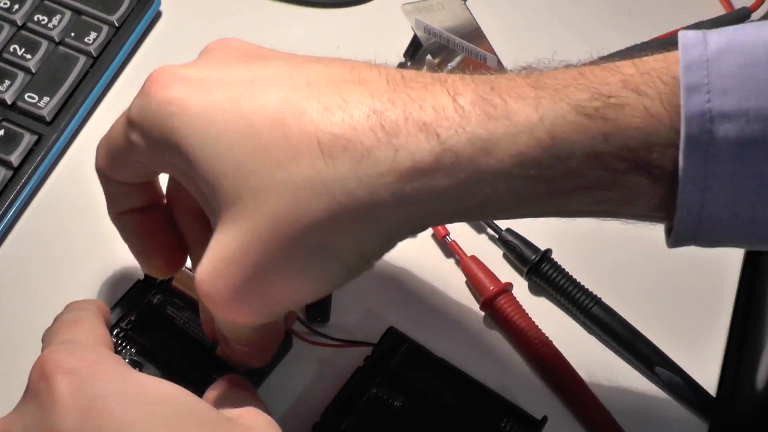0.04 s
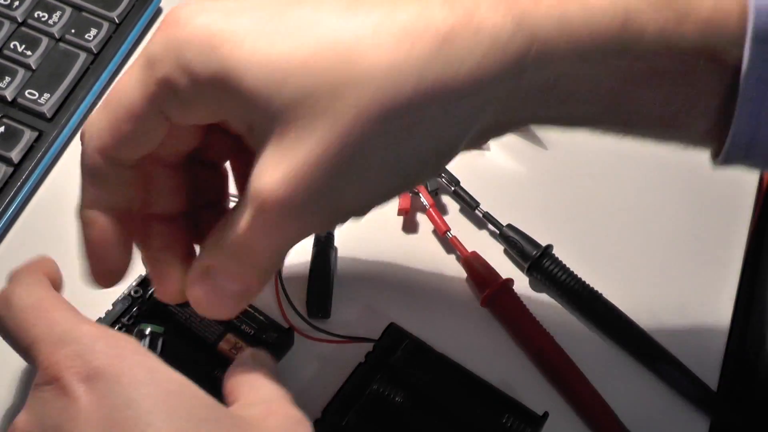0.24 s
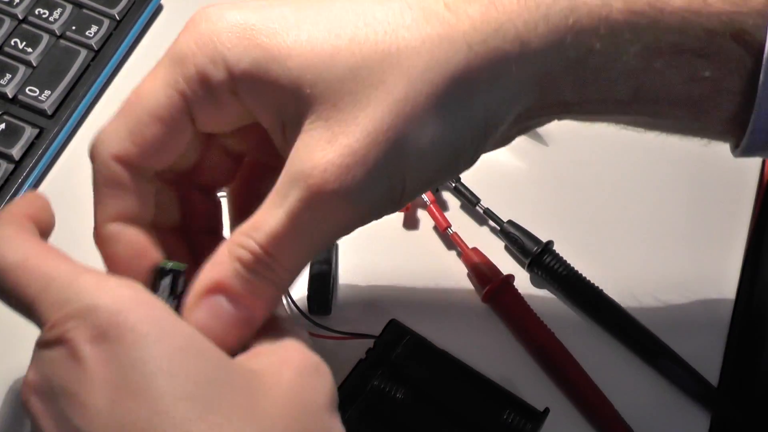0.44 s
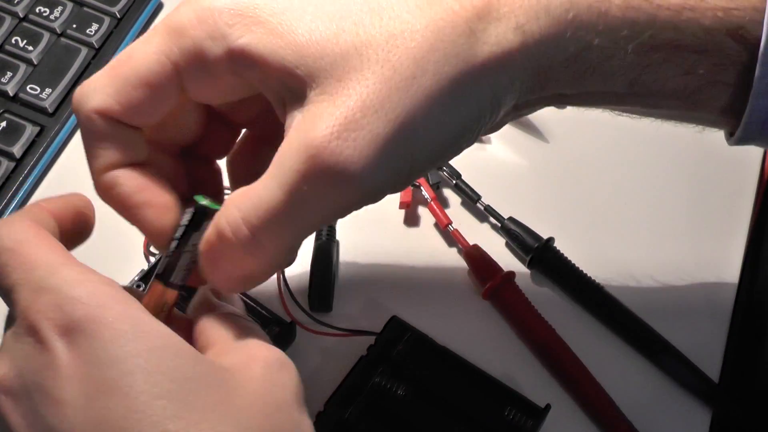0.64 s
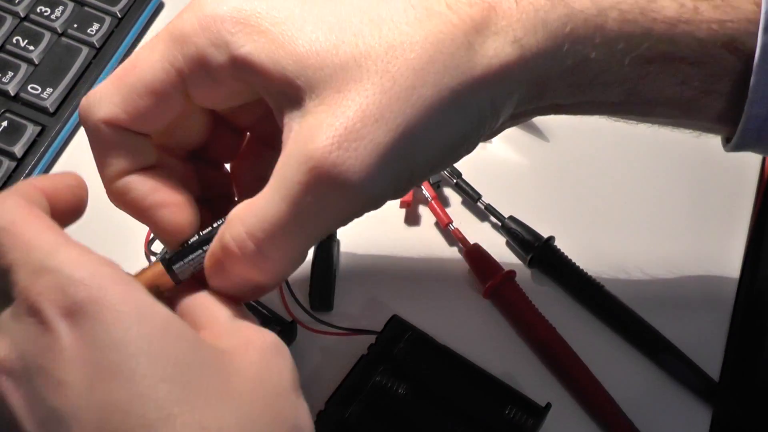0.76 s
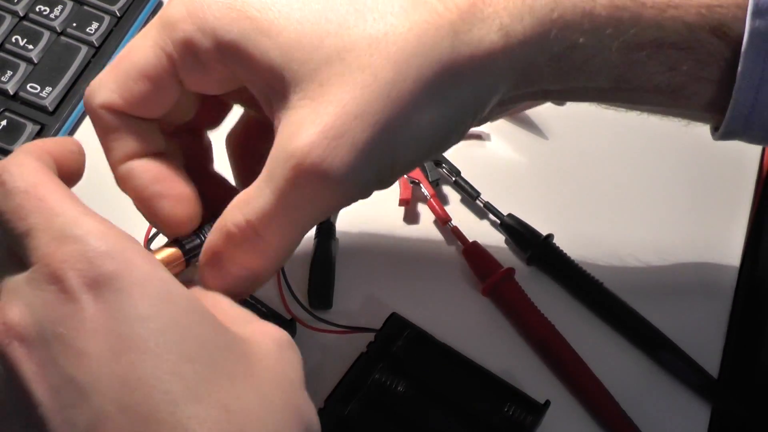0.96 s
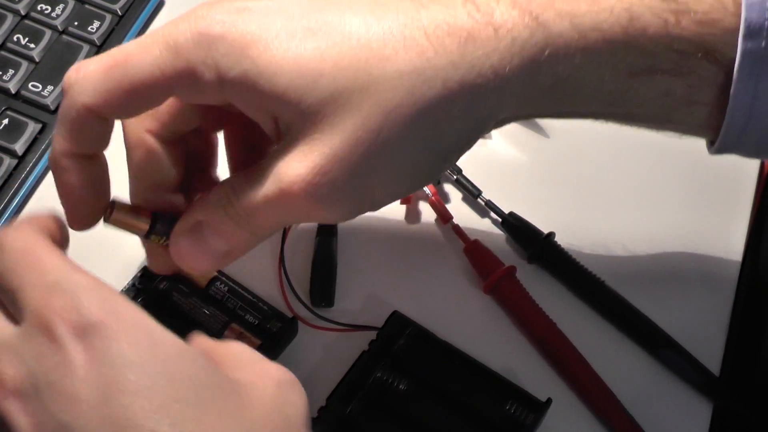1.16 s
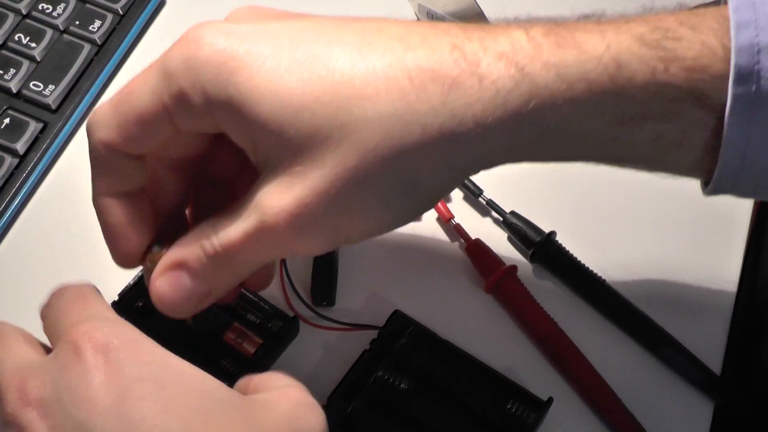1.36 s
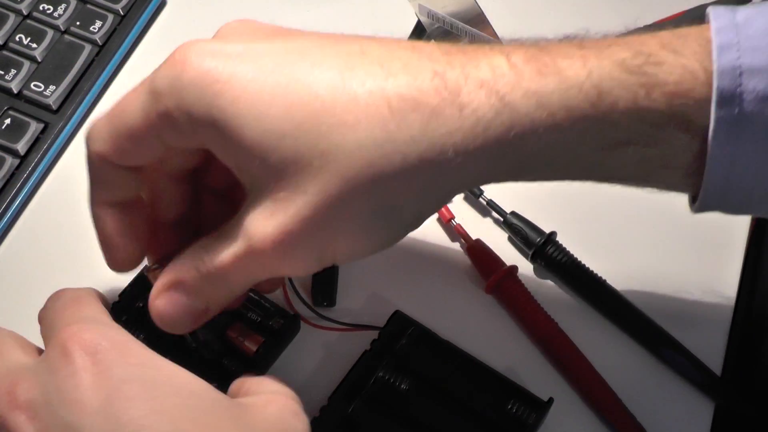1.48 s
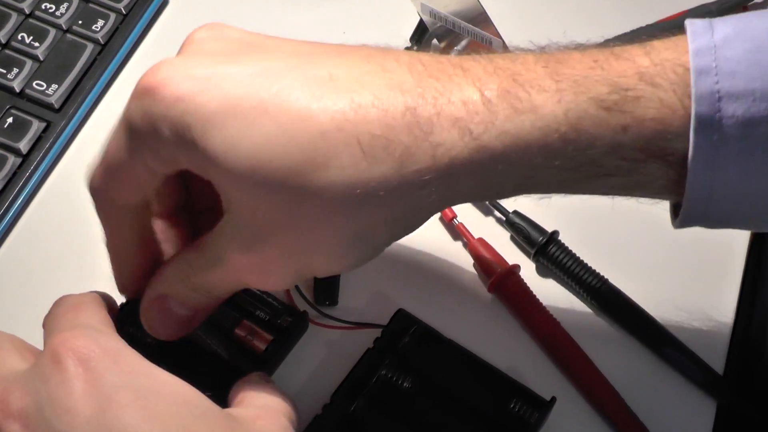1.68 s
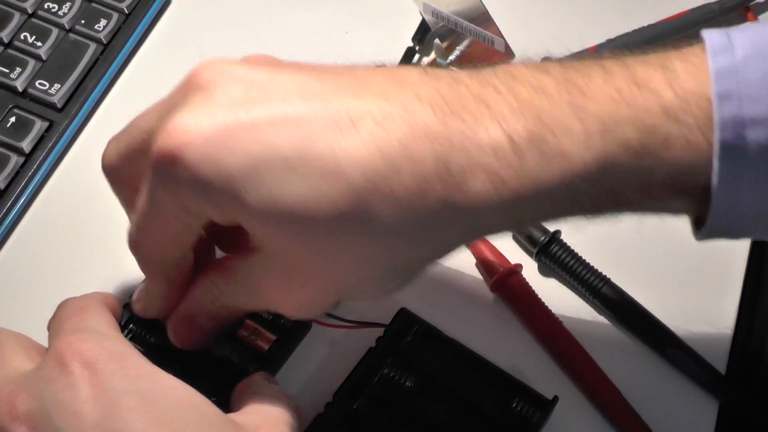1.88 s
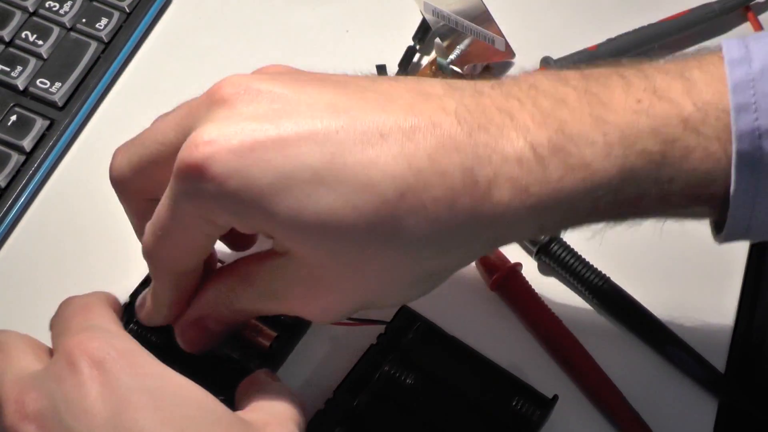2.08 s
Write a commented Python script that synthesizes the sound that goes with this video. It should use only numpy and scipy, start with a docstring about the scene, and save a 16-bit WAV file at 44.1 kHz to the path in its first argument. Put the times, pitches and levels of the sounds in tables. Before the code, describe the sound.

Small batteries are fitted into a plastic holder on a desk, heard close in a small room. A short hollow clatter with soft finger rubbing comes at 0.13-0.2 seconds, then only faint metallic ticks until 1.3. Rapid clacks follow at 1.41-1.5, lighter taps near 1.6, firmer knocks around 1.7, and the loudest snap with a low thump at 1.94. A faint tap ends it at 2.1, over steady hum and fan hiss.

```python
"""Small batteries clatter into a plastic holder on a desk, with light metal ticks and soft finger rubbing.
Each knock rings the desk and the holder's parts as fading tones and noise; one cell snaps home past its
spring and jolts the microphone. The sound flutters between the desk and a nearby surface and dies in a
small room, over a faint electrical hum (wavering tones) and fan noise (filtered noise)."""
import sys
import numpy as np
from scipy import signal
from scipy.fft import rfft, irfft, next_fast_len
from scipy.io import wavfile

SR = 44100
rng = np.random.default_rng(int(sys.argv[2]) if len(sys.argv) > 2 else 0)


def master(y):
    """Save y as 16-bit WAV."""
    cut = np.clip(np.atleast_2d(y).T, -1, 1)
    pcm = np.round(cut * 32767)  # scale
    wavfile.write(sys.argv[1], SR, pcm.astype(np.int16))


N = 93580
TIME = np.arange(N) / SR
RING_T = np.arange(8192) / SR   # seconds since a contact

# In the tables, t60 is the time a ring takes to fade by 60 dB.
# A cell knocks on the holder. Each row: start in seconds, levels in dB of the desk thud, the hollow sound
# (shell and cavity together), the walls, the metal ring and the crack, scuff fading time in seconds.
KNOCKS = [(.1285, -53, -40.5, -43, -53.5, -62, 0.0016), (.151, -41, -47.5, -54, -59, -75, 0.003),
          (.186, -68, -46, -62, -42, -62, 0.005), (.1885, -41, -30.5, -37.5, -35.5, -56, 0.0014),
          (.197, -37.5, -29.5, -39.5, -43, -61, 0.002), (1.4123, -35, -27.5, -31.5, -43.5, -61, 0.00089),
          (1.4215, -62, -31.5, -41, -41, -74, 0.0029), (1.428, -67, -34.5, -28.5, -29.5, -67, 0.0019),
          (1.4345, -39, -32, -56, -49, -65, 0.0032), (1.4445, -43, -38.5, -36, -60, -65, 0.0081),
          (1.4545, -51, -27, -42, -45, -53, 0.00044), (1.476, -42.5, -45.5, -52, -52, -58, 0.0063),
          (1.498, -40, -41, -56, -66, -64, 0.0013), (1.588, -60, -45.5, -55.5, -65, -80, 0.0025),
          (1.599, -50, -44.5, -71, -78, -83, 0.00063), (1.6775, -39.5, -45, -54, -52.5, -78, 0.0024),
          (1.6855, -51, -35, -58.5, -60, -80, 0.0013), (1.696, -49, -52, -57, -52, -58.5, 0.018),
          (1.733, -49, -26.5, -41, -39, -55, 0.00084), (1.7362, -26, -29.5, -27.5, -33.5, -46, 0.0021),
          (1.744, -35, -25, -63, -60, -50.5, 0.0011), (1.767, -60, -35, -42, -68, -63, 0.0018),
          (1.82, -44, -53, -72, -68, -77, 0.0034), (1.865, -46, -51, -65, -70, -82, 0.0038),
          (1.9275, -47, -42, -34, -41, -38, 0.0033), (1.93, -64, -45, -46, -53, -50, 0.0016),
          (1.9338, -55, -33, -25.5, -24, -42, 0.0018), (1.937, -42, -25.5, -28, -19, -26, 0.000078),
          (1.9385, -35, -19.5, -24.5, -49, -40.5, 0.0013), (1.9454, -49, -35.5, -34, -40, -45, 0.0024),
          (2.1085, -46, -42.5, -42, -51.5, -55.5, 0.0017)]
# Light ticks of metal on the spring contacts. Each row: start in seconds, pitch in Hz, ring level in dB,
# crack level in dB.
TICKS = [(0.5608, 2900, -55, -71), (0.5757, 4340, -40.5, -55.5), (0.576, 1250, -55, -76),
         (.663, 5830, -64.5, -78), (0.716, 4000, -60.5, -85), (.837, 5900, -61, -70),
         (0.897, 1080, -61, -85), (1.287, 4170, -60.5, -84), (1.64, 4400, -66, -60.5),
         (1.807, 4800, -64, -55.5), (2.093, 4400, -46, -60)]
# Clear tones (modes) of each part. Each row: pitch in Hz, level within the part in dB, t60 in seconds.
DESK_MODES = [(119, 3, 0.14), (135, -17, 0.04)]
SHELL_MODES = [(574, -2, 0.044), (683.3, -5, 0.066), (795.6, -1.5, 0.043), (870, -4.5, 0.0033)]
WALL_MODES = [(940, 1.5, 0.0047), (1066, -11.5, 0.044), (1248, -28.5, 0.14), (1401, -4, 0.017),
              (1510, -28, 0.0027), (2250, -15, 0.019)]
METAL_MODES = [(3410, -17, 0.039), (3600, -18, 0.0068), (3780, -5, 0.12), (3980, 10.5, 0.0033),
               (4535, -15.5, 0.049), (4510, 2, 0.067), (4480, -22, 0.054), (5650, -7, 0.018),
               (6800, -25, 0.057)]
CRACK_MODES = [(7490, -1, 0.0068), (9650, 13, 0.0024), (9890, -1.5, 0.036), (13400, 16, 0.0041)]
CAVITY_MODES = [(333.7, -9.5, 0.065), (454, -2.5, 0.033), (496.5, 2.5, 0.041)]
# Modes too crowded to tell apart, one row each for desk, shell, walls, metal and crack. Each row: lowest Hz,
# highest Hz, level in dB against the clear tones, t60 in seconds before the scuff lengthens it.
DENSE_MODES = [(65, 229, -3, 0.011), (503, 965, -8.5, 0.0094), (787, 1640, 0, 0.022),
               (3050, 4680, 2, 0.027), (5560, 11600, 3, 0.022)]
# The same for the cavity, as a single row: lowest Hz, highest Hz, level in dB, t60 in seconds.
CAVITY_DENSE = (231, 563, -13, 0)
# Fingers rub along the cells. Each row: start in seconds, length in seconds, level of the swell in dB.
RUBS = [(0.127, 0.089, -56.5), (1.585, 0.16, -60), (1.79, 0.28, -64)]
# Tone colour of the rubbing. Each row: frequency in Hz, relative level in dB per Hz.
RUB_COLOUR = [(100, -15), (450, 8.5), (900, 1), (2200, -11), (4000, -2.5), (6500, -17.5), (14000, -23)]
# Room tail. Each row: frequency in Hz, tail in dB against the direct sound, t60 in seconds,
# side (left-right difference) against middle in dB.
ROOM = [(120, -5.5, 0.21, -18), (298, -6, 0.2, -9.5), (685, -10, 0.27, -12.5), (1470, -10, .24, -14),
        (4070, -13.5, 0.32, -30), (8000, -10, 0.18, -9.5), (14000, -16, 0.072, 3)]
# Hum tones. Each row: pitch in Hz, level in dB rms before the waver.
HUM = [(119.8, -56.5), (246.3, -58.5), (304, -69.5), (361, -73), (997, -78.5), (2922, -81.5)]
# Colour of the fan and hiss. Each row: frequency in Hz, relative level in dB per Hz.
AIR_COLOUR = [(25, -12), (75, -13), (180, -1.5), (300, 5.5), (420, -2), (700, -7.5), (1300, -11.5),
              (2200, -15.5), (2950, -9), (3500, -16.5), (4600, -18.5), (7500, -26), (11000, -21),
              (14000, -20.5), (14800, -51)]
# Stereo width of the fan and hiss. Each row: frequency in Hz, side against middle in dB.
AIR_SIDE = [(50, 2), (250, -14), (600, -6.5), (1400, -12), (3000, -59.5), (6000, -26), (9000, -5.5),
            (14000, -4)]

GRIT_PER_S = 655     # scuff strength per second of its length; a long scuff outweighs the click
SCUFF_RISE = 0.52    # build-up time as a share of the scuff's fading time
CAVITY_DB, CAVITY_PER_SOFT_DB = -10.5, 0.83   # cavity over shell; extra dB per dB of hollow over walls
JOLT_S, JOLT_HZ, JOLT_T60_S = 1.938, 126, 0.018
JOLT_LEFT_DB, JOLT_RIGHT_DB = -10, -5.5
RATTLE_DB, RATTLE_T60_S, RATTLE_CUT_HZ = -19, 0.017, 500
TICK_SCUFF_S, TICK_T60_S = 0.0011, 0.013
TICK_SPREAD, TICK_DENSE_DB = 1.2, 2   # crowded modes: reach around the pitch (ratio), level
RUB_FLICKER_DB, RUB_FLICKER_HZ = 4.5, 120   # typical swing; flicker slower than about this
FLUTTER_S, FLUTTER_DB, FLUTTER_CUT_HZ = 0.00878, -8, 900   # per round
ROOM_BUILD_S = 0.001
HUM_WAVER = 0.21   # typical swing as a share of the level
FAN_HZ, FAN_WIDTH_HZ, FAN_DB = 108.3, 9.8, -68
AIR_DB = -59.5
LEFT_DB = 1.53     # left over right, for hum, drone and desk
STOP_HZ = 16600    # 60 dB down from here up
OPPOSITE = [[1], [-1]]   # left as is, right upside down


def from_db(db):
    """Turn dB into a plain factor."""
    return 10 ** (np.asarray(db) / 20)


def unit(x):
    """Scale to energy 1."""
    return x / np.sqrt(np.sum(x ** 2) + 1e-20)


def decay(t, t60):
    """Fade by 60 dB every t60 seconds."""
    return np.exp(-np.log(1000) * t / t60)


def at_hz(table, hz, column=1):
    """Read a table column between its rows, along a logarithmic pitch scale."""
    rows = np.array(table)
    return np.interp(np.log(hz + 1), np.log(rows[:, 0]), rows[:, column])


def band(x, low_hz, high_hz):
    """Keep mainly the sound between two frequencies."""
    return signal.sosfilt(signal.butter(2, [low_hz, high_hz], "band", fs=SR, output="sos"), x)


def frequencies():
    """Frequencies in Hz of the full-length spectrum."""
    return np.fft.rfftfreq(N, 1 / SR)


def coloured(gain):
    """Noise of rms 1 with the given gain per frequency."""
    spectrum = rfft(rng.standard_normal(N)) * gain
    return unit(irfft(spectrum, N)) * np.sqrt(N)


def leftward(x):
    """Make two channels, the left a little stronger."""
    return x * from_db([[LEFT_DB / 2], [-LEFT_DB / 2]])


def strike(times, levels_db, scuffs_s, modes, dense):
    """A click and a noisy scuff excite one part's clear tones; band noise stands for its crowded modes."""
    low_hz, high_hz, dense_db, dense_t60 = dense
    t = RING_T
    out = np.zeros(N + len(t))
    clear = sum(from_db(db) * np.cos(2 * np.pi * hz * t) * decay(t, t60) for hz, db, t60 in modes)
    clear = band(clear, low_hz * 0.83, high_hz * 1.2)
    for s, db, scuff_s in zip(times, levels_db, scuffs_s):
        scuff_noise, dense_noise = rng.standard_normal((2, len(t)))
        rise = 1 - np.exp(-(t + 1 / SR) / (SCUFF_RISE * scuff_s))
        force = GRIT_PER_S * scuff_s * unit(scuff_noise * rise * np.exp(-t / scuff_s))
        force[0] += 1   # the click
        clear_ring = unit(signal.fftconvolve(clear, force)[:len(t)])
        dense_shape = rise * decay(t, dense_t60 + 4 * scuff_s)
        dense_ring = unit(band(dense_noise * dense_shape, low_hz, high_hz))
        ring = unit(clear_ring + from_db(dense_db) * dense_ring)
        start = int(s * SR)
        # the level is the rms the ring would have if packed into 5 ms
        out[start:start + len(t)] += from_db(db) * ring * np.sqrt(0.005 * SR)
    return out[:N]


def holder():
    """Each knock reaches the desk and every part; soft ones, with weak walls, favour cavity over shell."""
    knock_s, desk_db, hollow_db, walls_db, metal_db, crack_db, scuffs_s = np.transpose(KNOCKS)
    cavity_over_shell_db = CAVITY_DB + CAVITY_PER_SOFT_DB * (hollow_db - walls_db)
    # shell and cavity share the hollow sound's energy
    shell_db = hollow_db - 10 * np.log10(1 + from_db(cavity_over_shell_db) ** 2)
    levels = (desk_db, shell_db, walls_db, metal_db, crack_db)
    modes = (DESK_MODES, SHELL_MODES, WALL_MODES, METAL_MODES, CRACK_MODES)
    desk, *rest = [strike(knock_s, db, scuffs_s, clear, dense)
                   for db, clear, dense in zip(levels, modes, DENSE_MODES)]
    cavity = strike(knock_s, shell_db + cavity_over_shell_db, scuffs_s, CAVITY_MODES, CAVITY_DENSE)
    return leftward(desk) + sum(rest) + cavity


def jolt():
    """The snap shakes two microphone capsules in opposite senses: a damped low swing and a short rattle."""
    t = np.maximum(TIME - JOLT_S, 0)
    swing = np.sin(2 * np.pi * JOLT_HZ * t) * decay(t, JOLT_T60_S)
    noise = coloured(1 / np.hypot(1, frequencies() / RATTLE_CUT_HZ) ** 0.97)
    rattle = from_db(RATTLE_DB) * noise * decay(t, RATTLE_T60_S) * (t > 0)
    return (from_db([[JOLT_LEFT_DB], [JOLT_RIGHT_DB]]) * swing + rattle) * OPPOSITE


def ticks():
    """Each tick rings briefly at a pitch of its own, under a thin crack."""
    start_s, _, _, crack_db = np.transpose(TICKS)
    rings = np.zeros(N)
    for s, hz, ring_db, _ in TICKS:
        dense = (hz / TICK_SPREAD, hz * TICK_SPREAD, TICK_DENSE_DB, TICK_T60_S)
        rings += strike([s], [ring_db], [TICK_SCUFF_S], [(hz, 0, TICK_T60_S)], dense)
    cracks = strike(start_s, crack_db, [TICK_SCUFF_S] * len(start_s), CRACK_MODES, DENSE_MODES[-1])
    return rings + cracks


def rubbing():
    """Skin sticks and slips on the cells: soft swells of noise with a grainy, flickering level."""
    swell = sum(from_db(db) * np.sin(np.pi * np.clip((TIME - s) / length, 0, 1)) for s, length, db in RUBS)
    hz = frequencies()
    flicker = coloured(1 / (1 + (hz / RUB_FLICKER_HZ) ** 2))
    grain = from_db(RUB_FLICKER_DB * flicker)
    return swell * grain * coloured(from_db(at_hz(RUB_COLOUR, hz)))


def flutter(x):
    """The sound with one short echo path, repeating, weaker and duller on every round."""
    size = next_fast_len(N + SR // 2)   # spare room for the echoes
    hz = np.fft.rfftfreq(size, 1 / SR)
    delay = np.exp(-2j * np.pi * hz * FLUTTER_S)
    one_round = from_db(FLUTTER_DB) * delay / (1 + 1j * hz / FLUTTER_CUT_HZ)
    return irfft(rfft(x, size) / (1 - one_round), size)[:, :N]


def room(x):
    """A diffuse noise tail that dies band by band, mostly alike in both channels."""
    t = TIME[:SR // 2]
    tail = 0
    edges = np.geomspace(60, 17000, 13)
    for low, high in zip(edges, edges[1:]):
        hz = np.sqrt(low * high)
        shape = decay(t, at_hz(ROOM, hz, column=2)) * (1 - np.exp(-t / ROOM_BUILD_S)) ** 2
        mid, side = [unit(band(noise * shape, low, high)) for noise in rng.standard_normal((2, len(t)))]
        stereo = mid + from_db(at_hz(ROOM, hz, column=3)) * side * OPPOSITE
        band_share = np.sqrt(2 * (high - low) / SR)   # wider bands carry more energy
        tail = tail + from_db(at_hz(ROOM, hz)) * band_share * stereo
    return signal.fftconvolve(x, tail, axes=1)[:, :N]


def background():
    """Wavering hum tones, a fan's narrow drone and its soft hiss."""
    hz = frequencies()
    slow = 1 / (1 + (hz / 6) ** 2)
    hum = np.zeros(N)
    for pitch_hz, db in HUM:
        tone = np.sqrt(2) * np.sin(2 * np.pi * (pitch_hz * TIME + rng.random()))
        hum += from_db(db) * tone * (1 + HUM_WAVER * coloured(slow))
    drone = from_db(FAN_DB) * coloured(1 / (1 + ((hz - FAN_HZ) / FAN_WIDTH_HZ) ** 2))
    colour = from_db(at_hz(AIR_COLOUR, hz))
    mid = coloured(colour)
    side = irfft(rfft(coloured(colour)) * from_db(at_hz(AIR_SIDE, hz)), N)
    return leftward(hum + drone) + from_db(AIR_DB) * (mid + side * OPPOSITE)


def scene():
    """The holder in its room, over the hum; the jolt gets no echo."""
    direct = holder() + ticks() + rubbing()
    return flutter(direct) + room(direct) + jolt() + background()


def record(dry):
    """A steep filter cuts the top."""
    return signal.sosfilt(signal.cheby2(14, 60, STOP_HZ, fs=SR, output="sos"), dry)


dry = scene()
out = record(dry)
master(out)
```